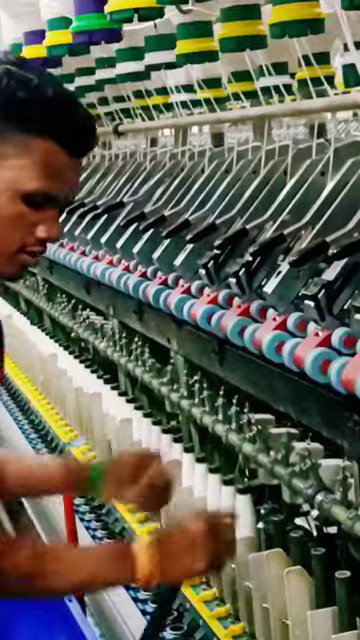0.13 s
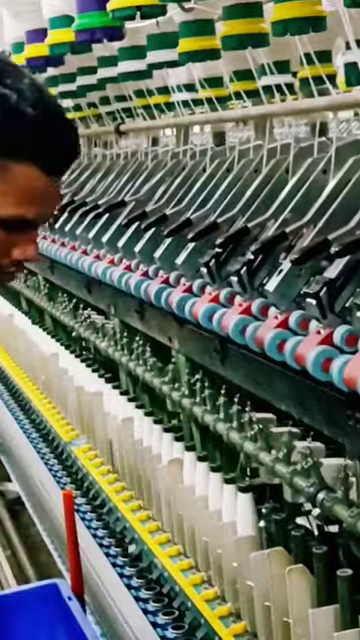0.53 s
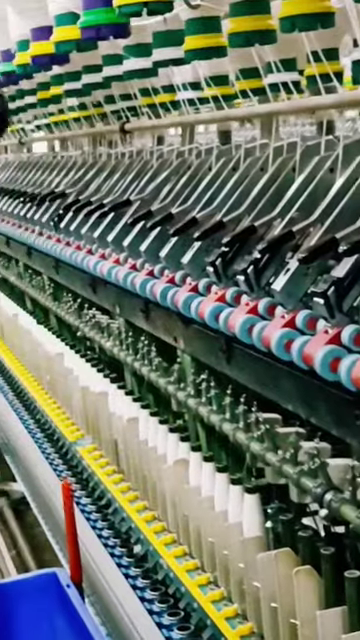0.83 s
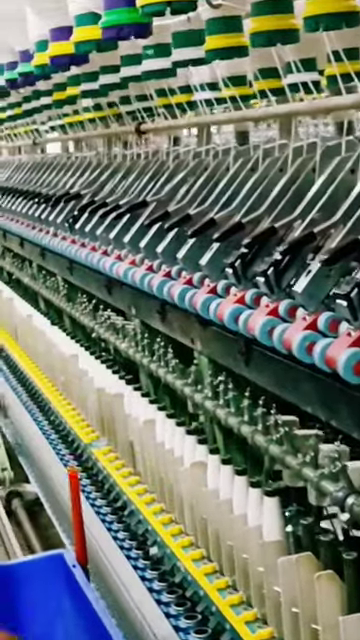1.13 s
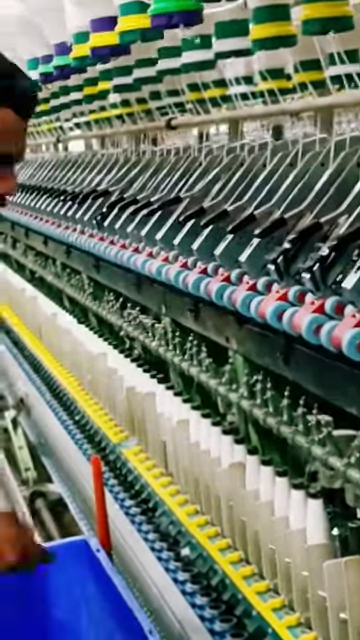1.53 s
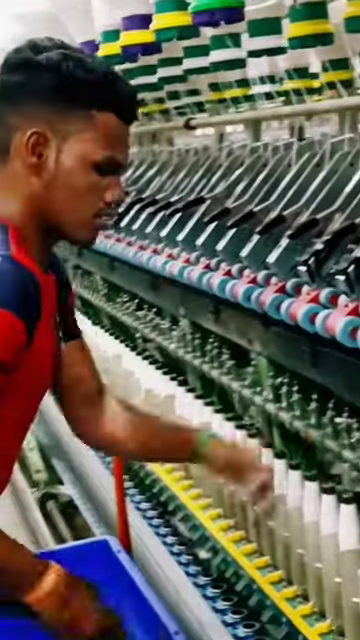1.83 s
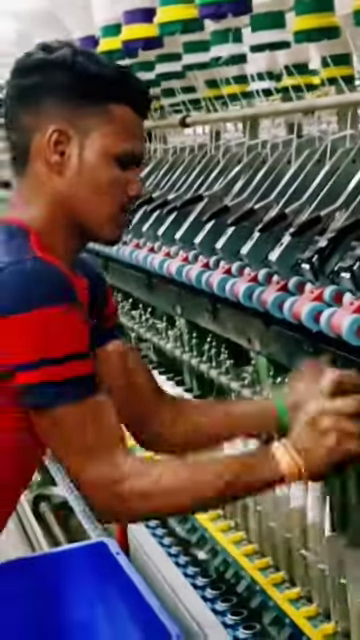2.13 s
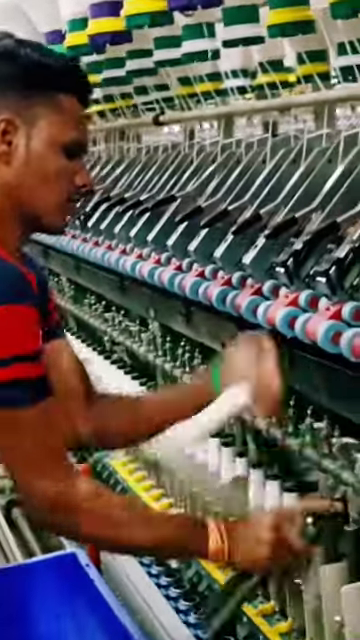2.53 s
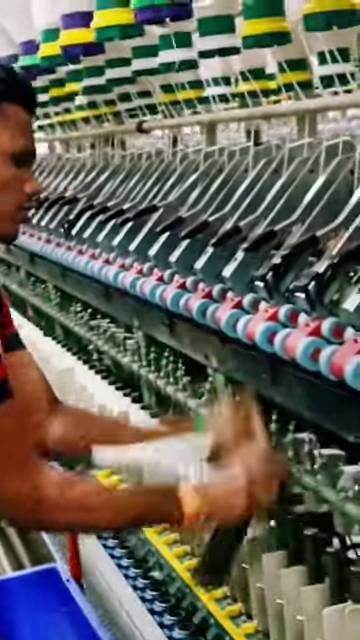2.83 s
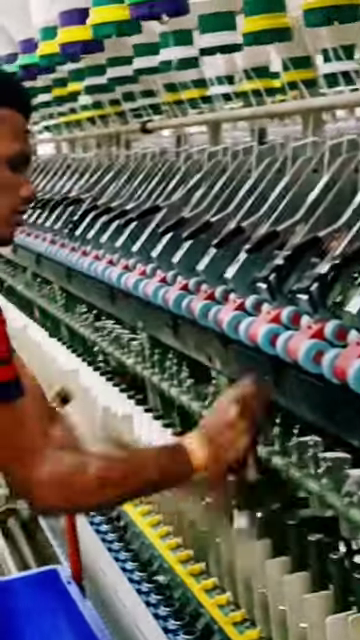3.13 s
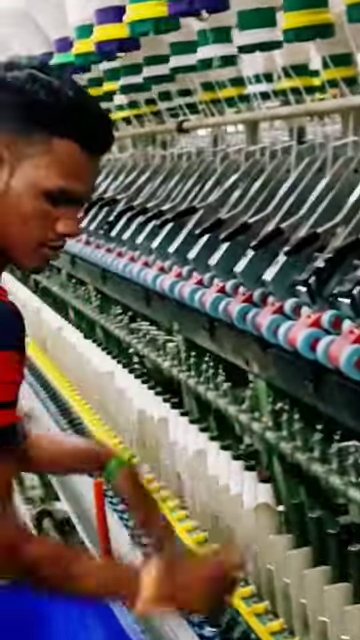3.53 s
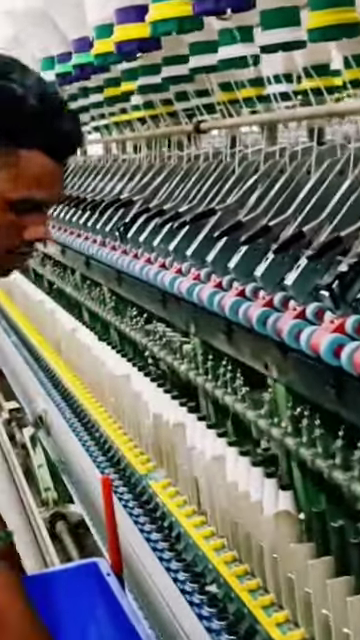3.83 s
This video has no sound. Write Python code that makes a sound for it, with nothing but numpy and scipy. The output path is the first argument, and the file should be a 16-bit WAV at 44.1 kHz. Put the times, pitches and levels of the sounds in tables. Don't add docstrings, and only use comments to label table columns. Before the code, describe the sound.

Spinning machine roar fades in from silence at about 0.2 to 0.5 s, then stays dense and steady to 4 s. Low spindle hum beats and swells unevenly, with faint shaft and fan whine beneath wide, slightly fluttering noise and blurred bright ticking. Plastic tubes rattle nearby at 0.75-0.95 s, briefly at 1.5, faintly around 2.4-2.55, and again at 3.95. Phone sound, treble slightly patchy.

```python
import sys
import numpy as np
from scipy import signal
from scipy.fft import rfft, irfft
from scipy.io import wavfile
from scipy.ndimage import uniform_filter1d

SR = 44100
rng = np.random.default_rng(int(sys.argv[2]) if len(sys.argv) > 2 else 0)


def rack_gain(trim_db):
    fader = np.asarray(trim_db, float)
    return 10 ** (fader / 20)


def dump_mix(stems):
    frames = np.atleast_2d(stems).T
    limited = np.clip(frames, -1, 1)
    pcm = np.round(limited * 32767).astype(np.int16)
    wavfile.write(sys.argv[1], SR, pcm)


N = 176400


def curve(hz, table):
    table_hz, table_db = np.array(table).T
    return np.interp(np.log(hz + 1), np.log(table_hz), table_db)


def unit(x):
    return x / np.sqrt(np.mean(x ** 2))


def walk(rate):
    hold = int(SR / min(rate, 40))
    steps = np.repeat(rng.standard_normal(N // hold + 1), hold)[:N]
    return unit(uniform_filter1d(uniform_filter1d(steps, hold), hold))


def clicks(rate, scatter_db):
    chance = rng.random((3, N))
    struck = chance[0] < rate / SR
    size = rack_gain(-scatter_db * np.log(1 - 0.95 * chance[2]))
    return struck * np.sign(chance[1] - 0.5) * size


def diffuse(pair):
    port_gap_m, sound_m_per_s = 0.15, 343
    likeness = np.sinc(2 * np.fft.rfftfreq(N, 1 / SR) * port_gap_m / sound_m_per_s)
    shared = rfft(pair[0]) * np.sqrt(1 + likeness)
    opposed = rfft(pair[1]) * np.sqrt(1 - likeness)
    return np.array([shared + opposed, shared - opposed]) / np.sqrt(2)


def cluster(hz, spread):
    f = np.fft.rfftfreq(N, 1 / SR)
    peak = np.exp(-0.25 * ((f - hz) / spread) ** 2)
    return unit(irfft(diffuse(rng.standard_normal((2, N))) * peak, N))


def swelling_hum(t, hz, spread, swell):
    side_db = -15.5
    swell_s, swell_db = np.array(swell).T
    phase = 2 * np.pi * np.cumsum(hz + spread * walk(5)) / SR
    side = rack_gain(side_db) * np.cos(phase + walk(3.26)) * np.array([[1], [-1]])
    return np.sqrt(2) * np.interp(t, swell_s, rack_gain(swell_db)) * (np.sin(phase) + side)


# turning speed in Hz, speed spread in Hz, hum level in dB (used for the middle bank
# only, the outer two follow their swell tables), overtone level in dB.
SPINDLE_BANKS = [
    (267.3, 1.33, -25, -34),
    (273.4, 3.4, -31.5, -36.5),
    (283.9, 1.61, -29, -35),
]
# multiple of the turning speed, level in dB.
UNBALANCE_OVERTONES = [(2, -1), (3, -9), (4, -8)]
# time in seconds, level in dB.
SLOW_BANK_SWELL = [(.58, -30.5), (.68, -20), (.85, -23.5), (1.03, -32), (1.1, -23), (1.25, -19),
                   (1.36, -48), (1.52, -25), (1.62, -36), (1.76, -22), (2.01, -42), (2.44, -21),
                   (2.66, -32), (3.04, -30), (3.11, -19), (3.27, -33.5), (3.7, -21.5), (3.99, -31.5)]
# time in seconds, level in dB.
FAST_BANK_SWELL = [(0.45, -29), (0.49, -38), (1.38, -27), (1.43, -46), (1.52, -23), (1.56, -32),
                   (1.82, -31), (2.02, -50), (2.05, -32), (2.2, -23), (2.23, -47), (2.77, -23.5),
                   (3.06, -34), (3.08, -28), (3.28, -33.5), (3.68, -27), (3.83, -33), (3.95, -32)]


def spindles(t):
    slow, middle, fast = SPINDLE_BANKS
    out = swelling_hum(t, slow[0], slow[1], SLOW_BANK_SWELL)
    out = out + swelling_hum(t, fast[0], fast[1], FAST_BANK_SWELL)
    out = out + rack_gain(middle[2]) * cluster(middle[0], middle[1])
    for hz, spread, _, overtone_db in SPINDLE_BANKS:
        for multiple, db in UNBALANCE_OVERTONES:
            out = out + rack_gain(overtone_db + db) * cluster(multiple * hz, multiple * spread)
    return out


# middle in seconds, half length in seconds, level in dB, left over right in dB.
TUBE_RATTLES = [(0.74, 0.013, -27, -3), (.779, 0.025, -16, -3), (0.82, 0.022, -34, -10),
                (0.861, 0.04, -22.5, -7.5), (0.888, 0.017, -25.5, 15), (0.934, 0.0073, -31, 10),
                (1.107, .015, -47, -1), (1.513, 0.02, -22, 2), (2.4, .015, -29, 1), (2.555, 0.0093, -29, 2),
                (3.93, 0.01, -23, 2), (3.957, 0.022, -26, 2)]
# pitch in Hz, level in dB, t60 decay in seconds.
TUBE_MODES = [(2100, 0, .02), (2600, -5, .012), (3800, -1, .022), (3980, -2, .018), (5400, -5, .015),
              (5720, -2, .022), (6450, -6, .015), (7400, -10, .01)]


def tubes(t):
    knocks_per_s, scatter_db, scuff_db, scuff_top_db = 2500, 0.83, -2, -1.5
    knocks = np.array([unit(clicks(knocks_per_s, scatter_db)) for _ in range(2)])
    burst = 0
    for middle, half, db, pan in TUBE_RATTLES:
        sides = rack_gain(db + np.array([[pan / 2], [-pan / 2]]))
        burst = burst + sides * np.exp(-((t - middle) / half) ** 2)
    ring = np.arange(4096) / SR
    body = 0
    for hz, db, t60 in TUBE_MODES:
        decay = np.exp(-np.log(1000) * ring / t60)
        body = body + rack_gain(db) * np.sin(2 * np.pi * hz * ring) * decay / np.sqrt(t60)
    body = body / np.sqrt(np.sum(body ** 2))
    rung = signal.fftconvolve(knocks * burst, body[None])[:, :N]
    scrape = signal.butter(3, (1800, 7000), "band", fs=SR)
    hiss = signal.butter(4, 11500, "high", fs=SR)
    scuff = signal.lfilter(*scrape, rng.standard_normal((2, N)))
    scuff = scuff + rack_gain(scuff_top_db) * signal.lfilter(*hiss, rng.standard_normal((2, N)))
    return rung + rack_gain(scuff_db) * scuff * burst


def travellers(colour):
    ticks_per_s, scatter_db, from_hz, level_db = 2500, 3, 1120, -25
    f = np.fft.rfftfreq(N, 1 / SR)
    ticks = diffuse([clicks(ticks_per_s, scatter_db) for _ in range(2)])
    bright = f ** 2 / (f ** 2 + from_hz ** 2)
    return rack_gain(level_db) * unit(irfft(ticks * colour * bright, N))


# turning pitch in Hz, wander in Hz, level in dB.
SHAFTS_AND_FANS = [(163.4, 3.9, -47.5), (190.55, 1.8, -39), (215.7, 2.7, -42), (246.8, 5.6, -43),
                   (388.6, 1.9, -42), (405.8, 4.9, -49), (426.7, 4, -42.5), (492, 2.6, -49),
                   (1171, 4.7, -42.5), (1565, 8.2, -40)]


def drives():
    return sum(rack_gain(db) * cluster(hz, wander) for hz, wander, db in SHAFTS_AND_FANS)


def roar(colour):
    level_db = -19
    return rack_gain(level_db) * unit(irfft(diffuse(rng.standard_normal((2, N))) * colour, N))


# frequency in Hz, density in dB per Hz.
HALL_COLOUR = [(30, -31), (60, -15), (105, -3), (400, -0.5), (750, -3), (2000, 2.5), (2950, -1.5),
               (15000, -22)]


def frames():
    sway_db, flicker_db, flutter_db = 0.1, 0.87, 0.85
    f = np.fft.rfftfreq(N, 1 / SR)
    colour = rack_gain(curve(f, HALL_COLOUR))
    mix = rfft(roar(colour) + travellers(colour))
    octave = np.log2(np.clip(f, 32, 2 ** 14))
    sway = walk(3.07)
    out = 0
    for centre in np.arange(5, 14.1, 0.5):
        flicker = flicker_db * walk(9) + flutter_db * walk(25.07)
        if centre > 12.6:
            flicker = flicker / 2
        band = irfft(mix * np.clip(1 - 2 * abs(octave - centre), 0, 1), N)
        out = out + rack_gain(sway_db * sway + flicker) * band
    return out


def starve(x):
    limit_db, wander_db, from_s = -10, 2.2, 0.3
    how = dict(window="cosine", nperseg=2048, noverlap=1024)
    t, z = signal.stft(x, SR, **how)[1:]
    z = z[:, :1024]
    power = np.mean(abs(z.reshape(2, 64, 16, -1)) ** 2, axis=2)
    bands = 10 * np.log10(uniform_filter1d(power, size=3) + 1e-18)
    chance = rng.standard_normal(bands.shape[1:]) + rng.standard_normal(bands.shape) / 2
    neighbours = bands[0, np.r_[14:20, 33:40]].mean(axis=0)
    loud_enough = bands > neighbours + limit_db + wander_db * chance
    below_treble = (np.arange(64) < 22)[:, None]
    keep = loud_enough | below_treble | (t < from_s)
    return signal.istft(z * np.repeat(keep, 16, axis=1), nfft=2048, **how)[1][:, :N]


def scene():
    t = np.arange(N) / SR
    return spindles(t) + tubes(t) + drives() + frames()


def top_cut(x):
    return signal.sosfilt(signal.butter(12, 15530, fs=SR, output="sos"), x)


# frequency in Hz, gain in dB.
LEFT_COLOUR = [(600, 0.5), (1400, 4.5), (3700, 3.5), (4500, -3.5), (6300, 5), (8000, -1.5), (12000, 5.5),
               (15400, 4.5)]
# frequency in Hz, gain in dB.
RIGHT_COLOUR = [(600, 0.5), (1400, 0), (3500, -7), (4700, -5), (6500, -4.5), (8300, -2.5), (12500, 3.5),
                (14800, -8)]


def record(dry):
    notch_hz, notch_width_hz, notch_db = 9500, 1250, -8.5
    fade_from_s, fade_s, fade_bend, settle_db, settle_s = 0.17, 0.3, 0.85, 0.5, 0.28
    f, t = np.fft.rfftfreq(N, 1 / SR), np.arange(N) / SR
    ports = np.array([curve(f, LEFT_COLOUR), curve(f, RIGHT_COLOUR)])
    notch = notch_db * np.exp(-((f - notch_hz) / notch_width_hz) ** 4)
    heard = irfft(rfft(dry) * rack_gain(ports + notch), N)
    fade = np.clip((t - fade_from_s) / fade_s, 0, 1) ** fade_bend
    settle = rack_gain(settle_db * np.exp(-(t / settle_s - 1) ** 2))
    mix = starve(np.clip(heard * fade * settle, -1, 1))
    return top_cut(mix)


dry = scene()
out = record(dry)
dump_mix(out)
```